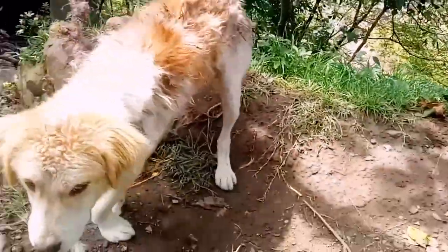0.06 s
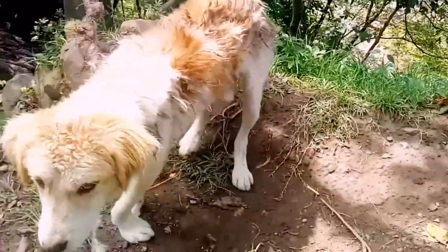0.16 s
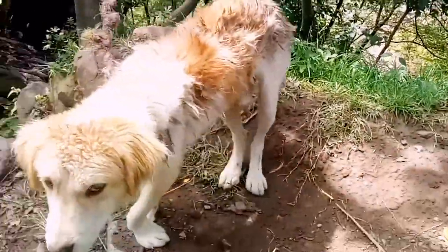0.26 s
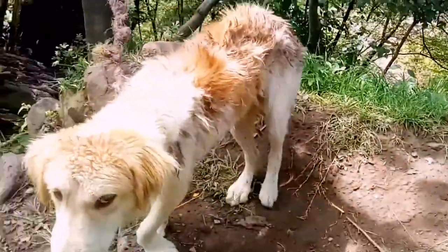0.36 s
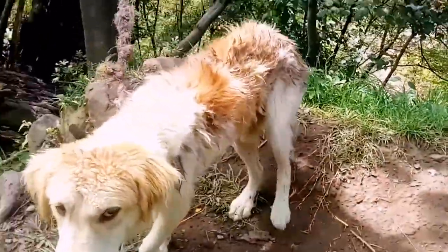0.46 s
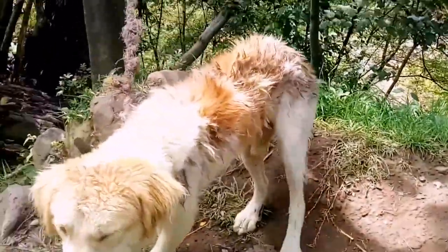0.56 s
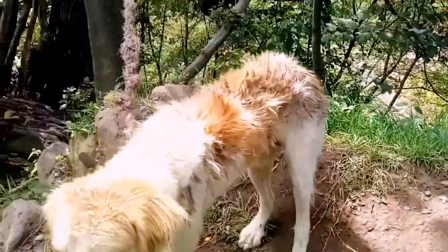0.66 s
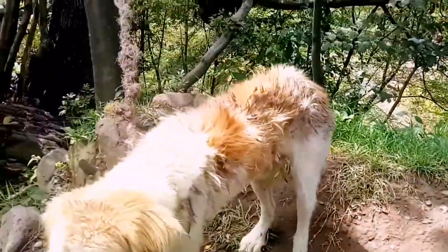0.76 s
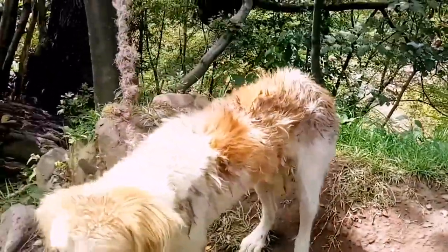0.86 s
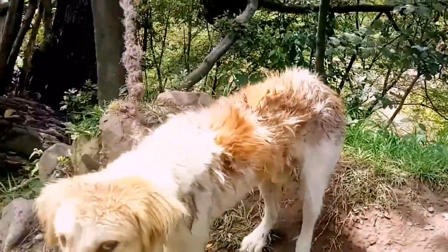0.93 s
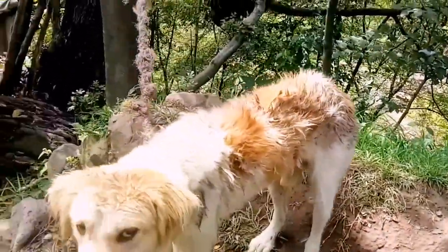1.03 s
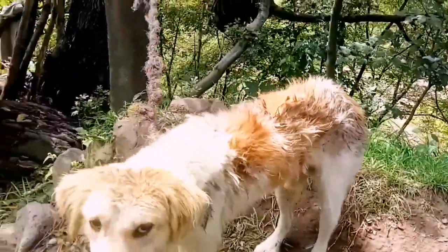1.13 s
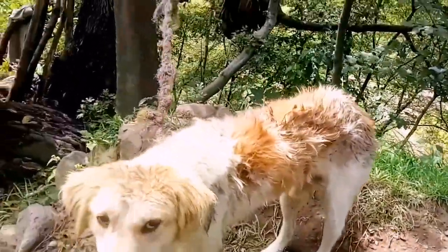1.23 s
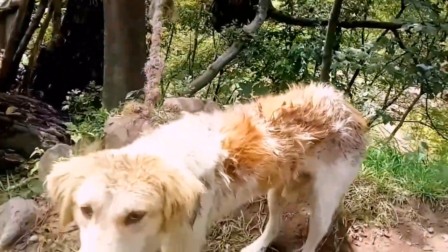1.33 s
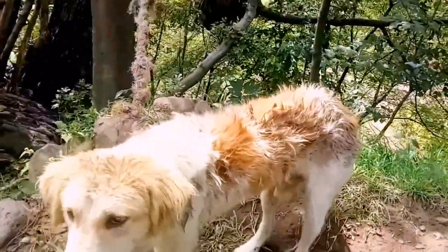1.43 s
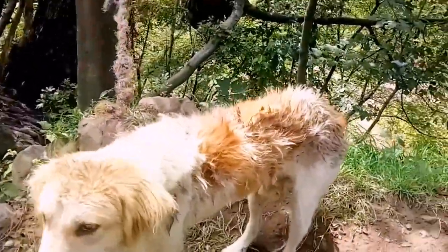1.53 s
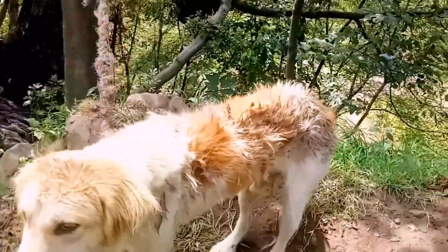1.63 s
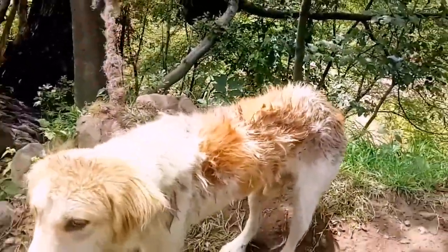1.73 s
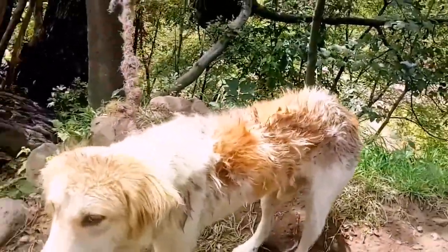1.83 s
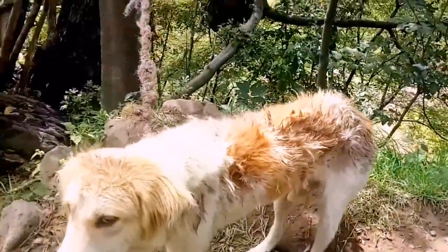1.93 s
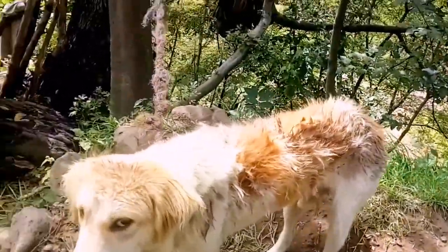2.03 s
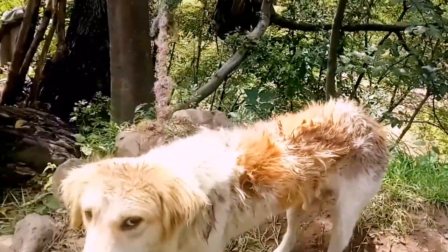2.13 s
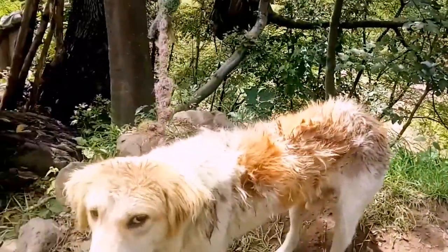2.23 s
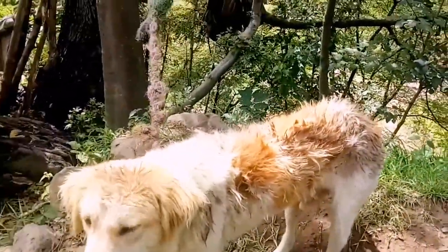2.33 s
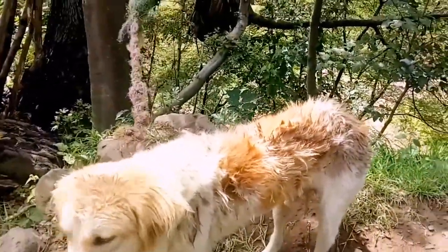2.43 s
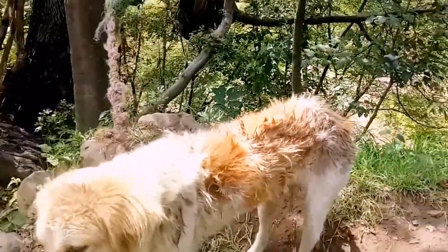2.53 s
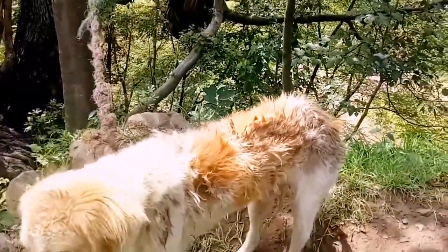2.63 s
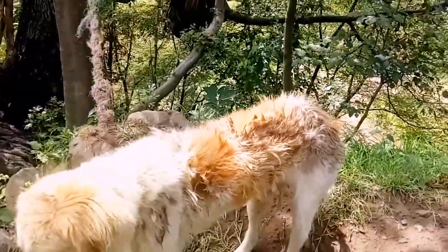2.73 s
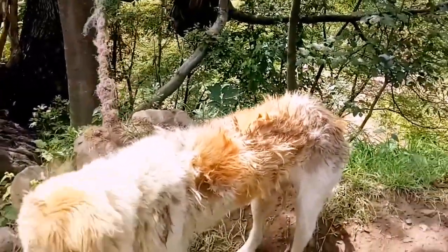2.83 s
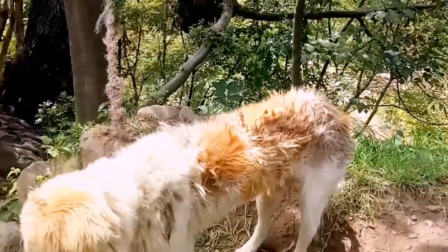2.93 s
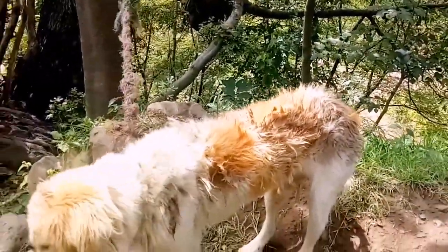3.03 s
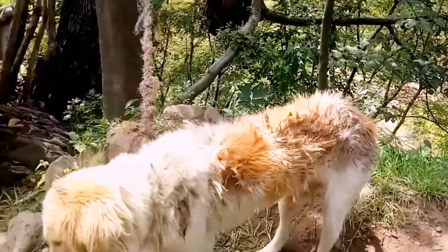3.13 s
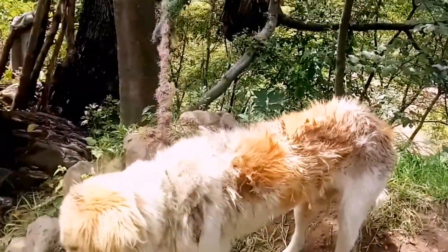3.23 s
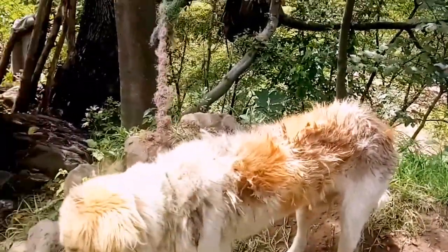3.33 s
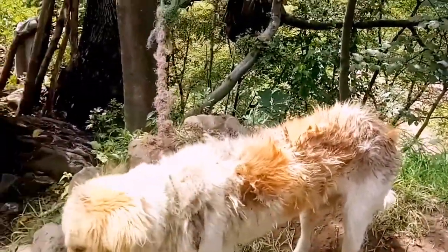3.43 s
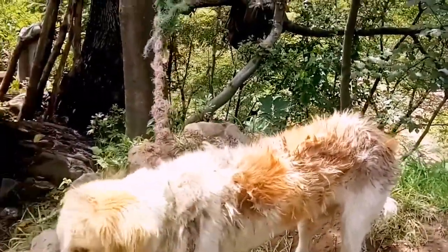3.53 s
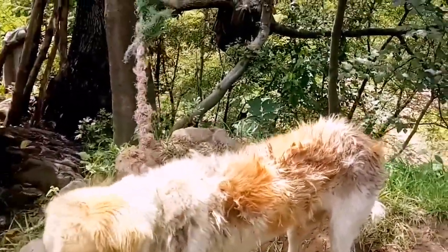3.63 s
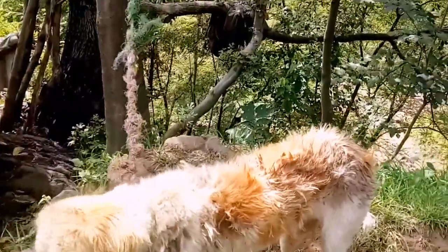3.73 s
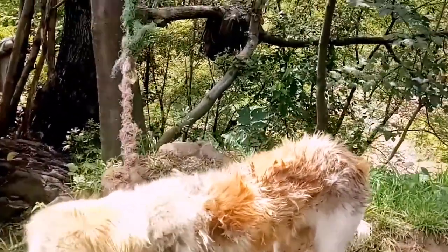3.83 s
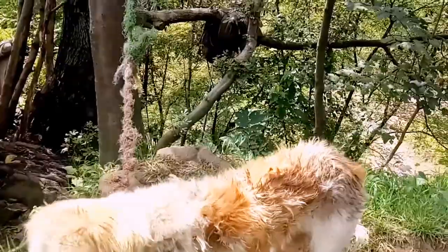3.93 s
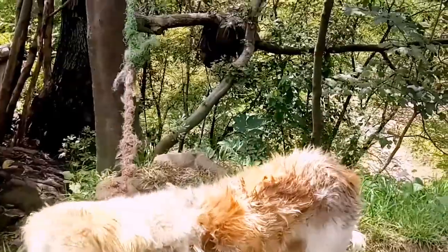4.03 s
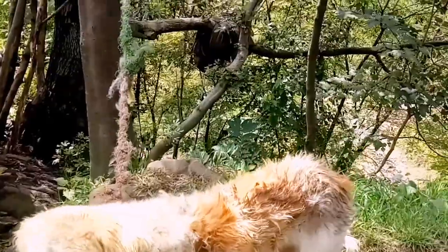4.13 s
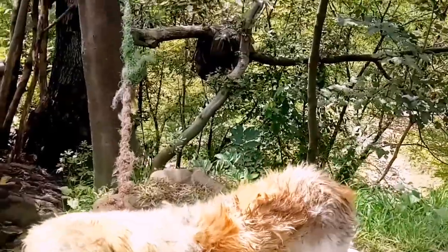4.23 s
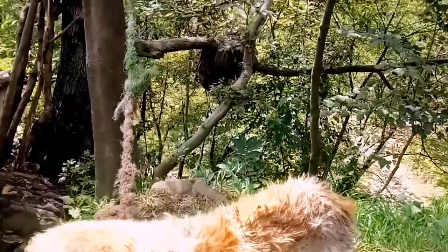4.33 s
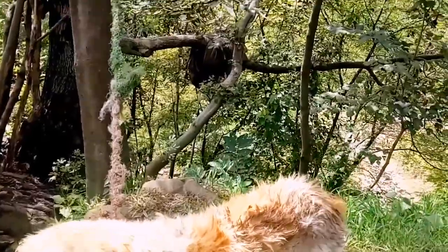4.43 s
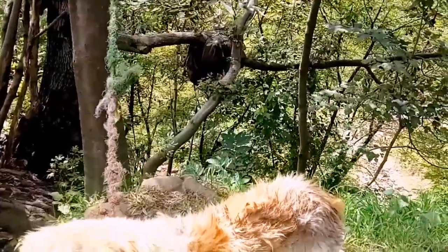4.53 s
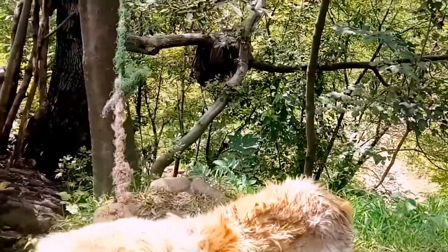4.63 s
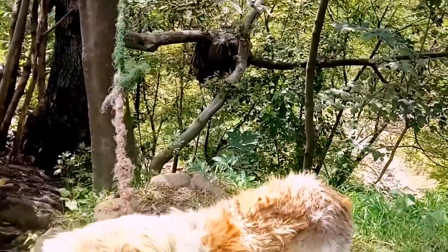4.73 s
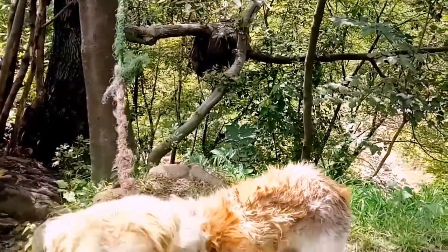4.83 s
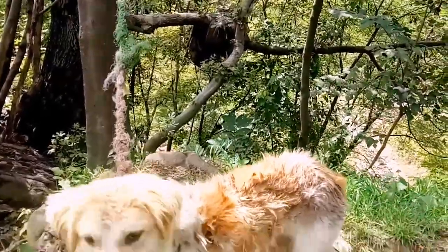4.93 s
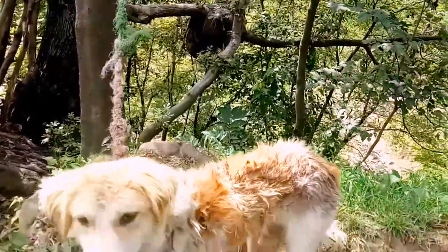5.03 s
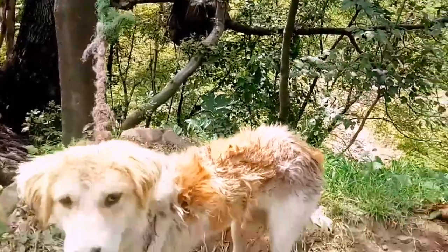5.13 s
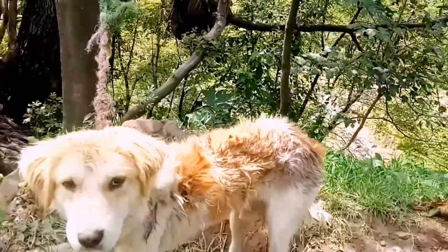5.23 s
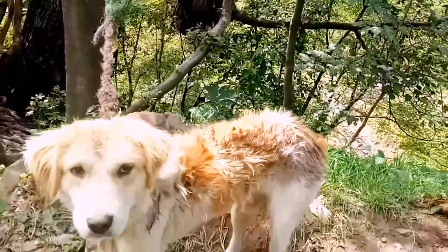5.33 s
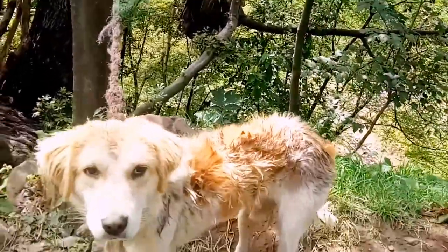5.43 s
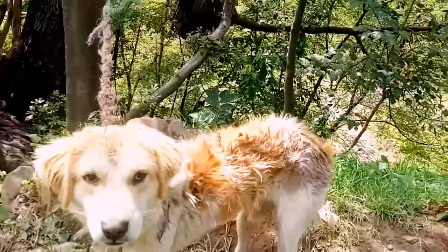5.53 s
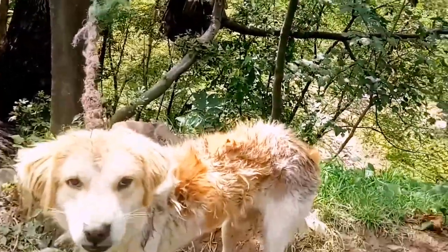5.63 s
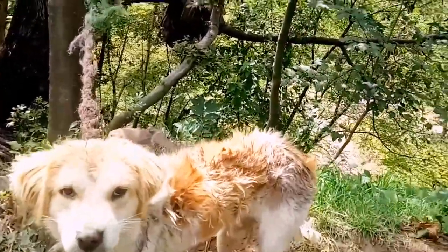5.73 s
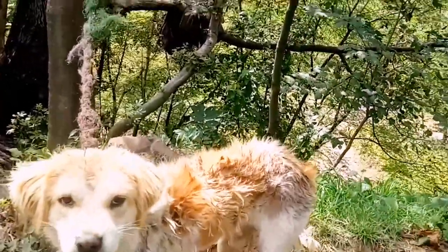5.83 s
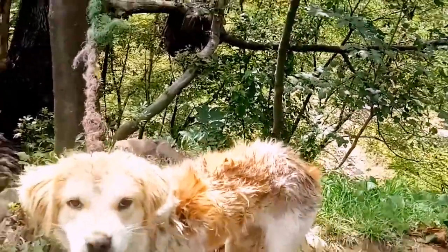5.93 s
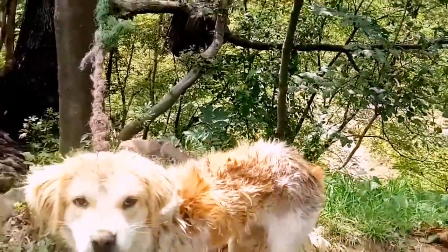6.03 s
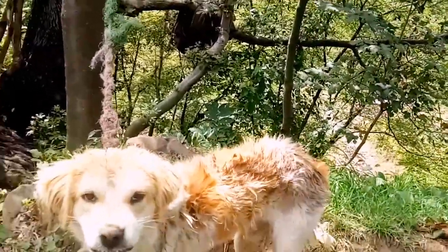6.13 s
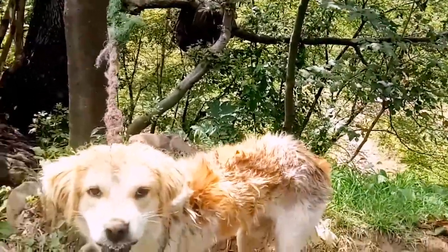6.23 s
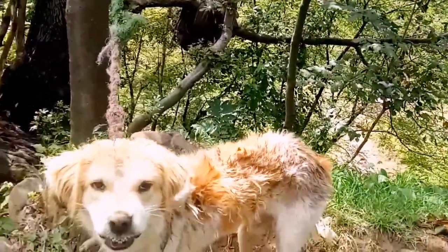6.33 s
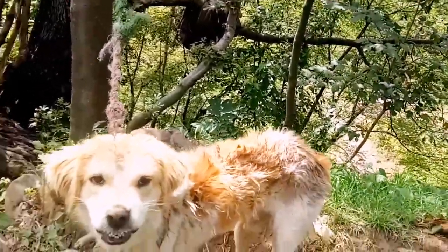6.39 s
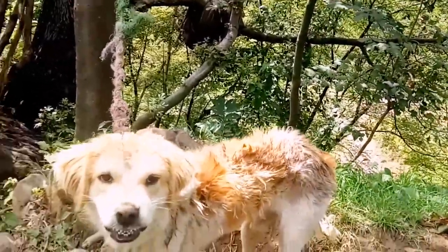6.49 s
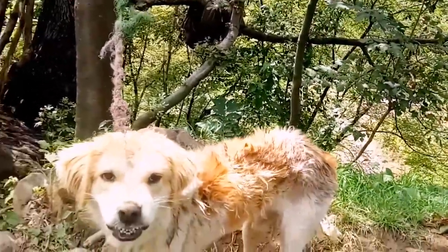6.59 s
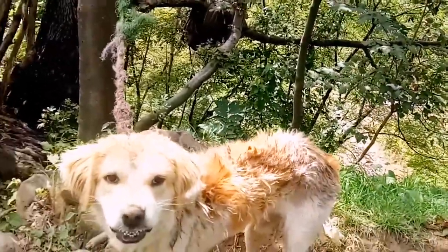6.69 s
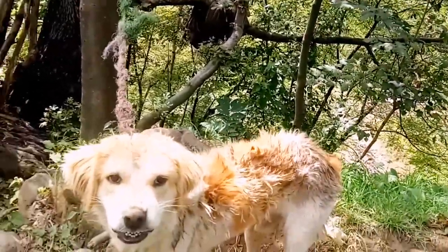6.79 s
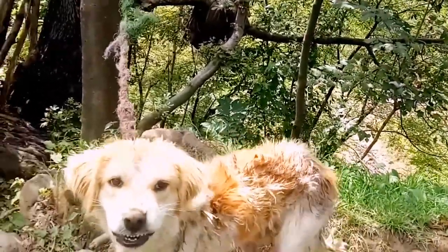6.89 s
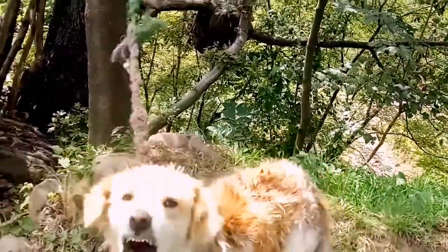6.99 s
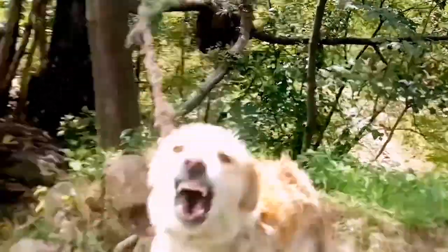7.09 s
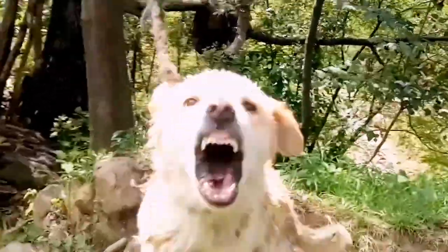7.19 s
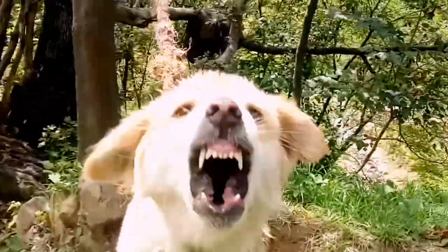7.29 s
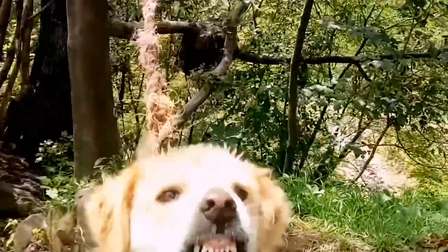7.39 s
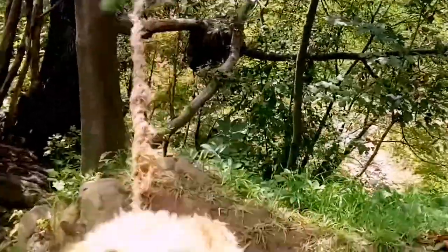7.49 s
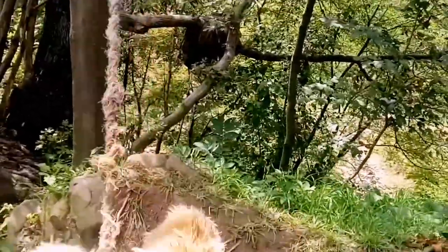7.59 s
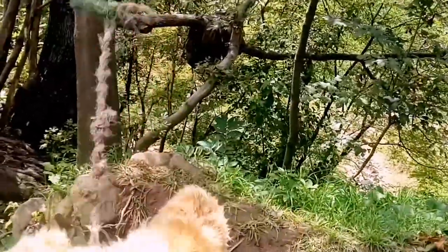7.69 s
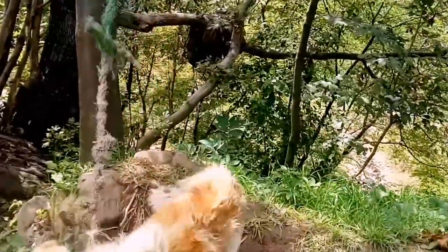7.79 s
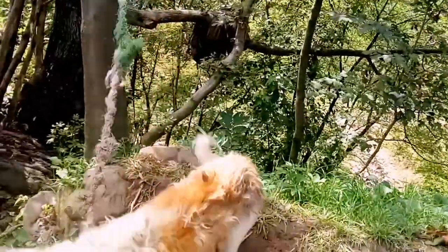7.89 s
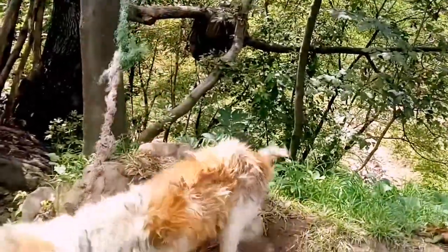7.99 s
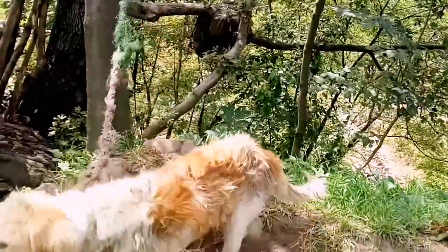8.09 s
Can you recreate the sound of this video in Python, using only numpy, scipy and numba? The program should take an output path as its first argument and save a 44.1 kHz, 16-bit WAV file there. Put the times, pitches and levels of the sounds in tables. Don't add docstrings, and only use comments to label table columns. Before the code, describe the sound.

A dog shuffles in dry leaves under a steady shrill cicada hiss, then at seven seconds bursts into harsh, overloaded close barks and a yelp.

```python
import sys
import numpy as np
from scipy import signal
from scipy.fft import rfft, irfft
from scipy.io import wavfile
from scipy.ndimage import uniform_filter1d, minimum_filter1d
from numba import njit

SR = 44100
rng = np.random.default_rng(int(sys.argv[2]) if len(sys.argv) > 2 else 0)


def decibels_to_gain(level_db):
    exponent = np.asarray(level_db, float) / 20
    return 10 ** exponent


def generate_wav(sig):
    pcm = np.round(np.clip(np.atleast_2d(sig).T, -1, 1) * 32767).astype(np.int16)
    wavfile.write(sys.argv[1], SR, pcm)


N = 359415
TIME = np.arange(N) / SR
HZ = np.maximum(np.arange(N // 2 + 1) * SR / N, 1)


def at_hz(points, column=1):
    points = np.array(points, float)
    return np.interp(np.log(HZ), np.log(np.maximum(points[:, 0], 1)), points[:, column])


def rms_one(x):
    return x / np.sqrt(np.mean(x ** 2) + 1e-20)


def drift(rate):
    knots = rng.standard_normal(int(9 * 200))
    return np.interp(TIME * rate, np.arange(len(knots)), knots) * 1.22


@njit
def resonate(x, hz, width, sr):
    y = np.zeros(len(x))
    r = np.exp(-np.pi * width / sr)
    for i in range(2, len(x)):
        drive = (1 - r * r) / 2 * (x[i] - x[i - 2])
        y[i] = drive + 2 * r * np.cos(2 * np.pi * hz[i] / sr) * y[i - 1] - r * r * y[i - 2]
    return y


# (frequency [Hz], left over right [dB], likeness [0-1])
PORTS = [(60, 10.5, 1), (300, 4.5, 0.3), (900, 9.5, 0.13), (2980, 9, 0.03), (4050, 13.5, 0.06),
         (4980, 8.5, 0.27), (6160, 0, 1), (8270, -1.5, 0.52), (9800, 1.5, 0.01), (11000, 6, 0.2),
         (13000, 16.5, .1), (15000, 19.5, .1)]
# (frequency [Hz], phase [rad])
PORT_LEAD = [(300, 0), (2500, 5.8), (4130, 5.2), (4910, 1.6), (5250, .1), (5600, 0)]


def at_ports(spectrum, sources):
    a, b = rfft(sources) * decibels_to_gain(at_hz(spectrum))
    right = decibels_to_gain(-at_hz(PORTS))
    alike = np.clip(at_hz(PORTS, column=2), 0, 1)
    even = 1 / np.sqrt(1 + right ** 2)
    other = alike * a * np.exp(-1j * at_hz(PORT_LEAD)) + np.sqrt(1 - alike ** 2) * b
    pair = irfft([even * a, even * right * other], N)
    return pair / np.sqrt(np.mean(pair.mean(axis=0) ** 2))


# (frequency [Hz], level [dB per Hz])
AIR = [(18, -38), (30, -20), (97, -15.5), (140, -9.5), (208, -9.5), (262, -9), (325, -8), (419, -13),
       (934, -6), (2630, -9), (3200, -22), (4160, -28), (7040, -120)]
# (time [s], level over calm [dB], fade [dB/s])
GUSTS = [(.0, 22, 70), (.56, 9.5, 53), (.97, 8.5, 90), (1.289, 14, 24), (2.3, 19.5, 120), (2.55, 25, 95),
         (3.18, 21.5, 95), (3.84, 18, 23), (4.45, 17.5, 7), (5.15, 15, 110), (5.36, 15, 15), (6.82, 10, 75),
         (7.002, 11, -11)]


def air():
    rise_db_per_s, calm_db = 96, -6.5
    noise = at_ports(AIR, rng.standard_normal((2, N)))
    lows = signal.sosfiltfilt(signal.butter(2, 550, fs=SR, output="sos"), noise)
    puffs = [db - np.maximum(rise_db_per_s * (s - TIME), fade * (TIME - s)) for s, db, fade in GUSTS]
    gust_db = calm_db + 0.53 * np.maximum(np.max(puffs, axis=0), 0) + 4.1 * drift(12)
    return decibels_to_gain(-45) * ((noise - lows) * decibels_to_gain(1.0 * drift(5.12)) + lows * decibels_to_gain(gust_db))


# (frequency [Hz], level [dB per Hz])
CHORUS = [(1650, -70), (2800, -31), (3140, -24.5), (3730, -7), (4120, 0), (4820, 1.5), (5930, -8),
          (7090, -21), (8010, -33.5), (9850, -33), (11400, -43.5), (14700, -30.5), (15400, -32)]
# (rate [1/s], depth [0-1])
BUZZES = [
    (36, 0.11),
    (88, 0.03),
    (420, 0),
]
# (time [s], level [dB])
WAVERS = [
    (2.71, -2.5),
    (4.72, 0.5),
    (4.82, 1),
]


def cicadas():
    waver_s = 0.05
    clicks = rng.standard_normal((2, N)) * decibels_to_gain(1.35 * rng.standard_normal((2, N)))
    for rate, depth in BUZZES:
        phase = 2 * np.pi * np.cumsum(rate * (1 + 0.0403 * drift(4))) / SR
        clicks = clicks * (1 + depth * np.sin(phase))
    waver_db = sum(db * np.maximum(1 - np.abs(TIME - s) / waver_s, 0) for s, db in WAVERS)
    return decibels_to_gain(-16.5 + waver_db + .5 * drift(9) + 0.82 * drift(40)) * at_ports(CHORUS, clicks)


def woods(x):
    t60_s, level_db, band_hz = 1, -36, [200, 2200]
    t = TIME[:SR]
    tail = rng.standard_normal((2, SR)) * decibels_to_gain(-60 * t / t60_s) * np.minimum(t / 0.014, 1)
    tail = signal.sosfilt(signal.butter(2, band_hz, "band", fs=SR, output="sos"), tail)
    tail = tail / np.sqrt(np.sum(tail ** 2) / 2)
    return decibels_to_gain(level_db) * signal.fftconvolve(x[None], tail, axes=1)[:, :N]


# (time [s], peak level [dB], centre [Hz], width [octaves], T60 [s])
SHUFFLES = [(.01, -35, 1400, 0.76, 0.94), (.005, -38, 824, 1.2, 0.33), (0.058, -35.5, 197, 0.62, 0.27),
            (0.499, -44.5, 169, 0.98, 1.04), (1.22, -39, 169, 1.2, 0.32), (2.297, -37.5, 139, 0.81, 0.26),
            (2.419, -45, 166, 0.95, 0.89), (2.599, -35.5, 1570, 1, 0.12), (3.13, -43.5, 425, 0.21, 0.71),
            (3.795, -28, 2600, .8, 0.042), (3.852, -30.5, 1900, 2.7, 0.13), (3.88, -33, 2740, .6, .03),
            (3.826, -38, 288, 0.35, 0.35), (3.835, -20, 2520, 0.76, 0.027), (4.391, -34, 285, 0.42, 0.24),
            (4.41, -31, 680, 0.76, 0.63), (4.47, -50.5, 750, 0.56, 1), (4.439, -37, 1430, 1.1, 0.69),
            (5.138, -36.5, 232, 0.46, 0.23), (1.46, -50, 111, 1.2, 0.7), (1.85, -49.5, 217, 1.4, 1.5),
            (7.96, -31, 147, 1.3, 0.51)]


def shuffles():
    out = np.zeros((2, N))
    t = TIME[:SR]
    for s, peak_db, hz, octaves, t60 in SHUFFLES:
        edges = hz * 2. ** np.array([-octaves / 2, octaves / 2])
        band = signal.butter(2, edges, "band", fs=SR, output="sos")
        mid, left, right = signal.sosfilt(band, rng.standard_normal((3, SR)))
        shape = decibels_to_gain(peak_db - 60 * t / t60) * np.minimum(t / (0.032 * t60), 1)
        step = rms_one(mid + 1.1 * np.array([left, right])) * shape * decibels_to_gain([[3], [-3]])
        i = round(s * SR)
        out[:, i:i + SR] += step[:, :N - i]
    return out


# (time [s], length [s], first pitch [Hz], last pitch [Hz], level [dB])
GROWLS = [
    (5.13, .25, 245.7, 219.3, -49.5),
    (5.38, .21, 244, 131, -50),
    (7.864, .1, 196.5, 148, -29.5),
]
# (multiple of pitch [-], level [dB])
GROWL_OVERTONES = [(2, -12.5), (3, -7)]


def growls():
    out = np.zeros(N)
    wobble, flutter_db = .025 * drift(25), 2.5 * drift(40)
    for start, length, first_hz, last_hz, db in GROWLS:
        way = np.clip((TIME - start) / length, 0, 1)
        pitch = (first_hz + (last_hz - first_hz) * way) * (1 + wobble)
        phase = 2 * np.pi * np.cumsum(pitch) / SR
        tone = np.sin(phase) + sum(decibels_to_gain(level_db) * np.sin(k * phase) for k, level_db in GROWL_OVERTONES)
        out += decibels_to_gain(db + flutter_db) * np.sin(np.pi * way) ** .6 * tone
    return out


# (time [s], fold pitch and first throat resonance [Hz], effort [dB], roughness [0-1], mouth [Hz])
HOARSE_BARK = [(7.035, 562, -28, .9, 900), (7.055, 614.6, -4, 0.73, 1010), (7.1, 645.4, -1.2, .85, 957),
               (7.13, 645.4, 1, 0.59, 875), (7.16, 633.5, -2.5, 0.9, 825), (7.187, 789.3, -10.5, .7, 560),
               (7.2, 799.5, -26, 0.81, 580), (7.249, 700, -59, .9, 805)]
LOUD_BARK = [(7.259, 559, -9, .9, 900), (7.288, 599.3, -3.5, 0.81, 955), (7.302, 589.6, 11, .24, 900),
             (7.349, 597, 9, .25, 900), (7.356, 643, 6, .14, 950), (7.397, 528, 6, .07, 790),
             (7.408, 513.5, -1, .8, 704), (7.43, 524, -7.5, 0.87, 734), (7.448, 477, -20, 0.77, 670)]
GROWLED_BARK = [(7.455, 488.2, -13.5, .6, 672), (7.475, 524.2, -10.5, .6, 680), (7.509, 567.4, -7, .7, 726),
                (7.54, 538, -15, .8, 715), (7.547, 554, -2, .6, 994), (7.585, 550, -0.2, .7, 914),
                (7.623, 578.5, -9, .7, 920), (7.635, 621, -21.5, .8, 1040),
                (7.66, 574.6, -15.5, 0.78, 1080)]
SNARL = [(7.693, 555, -20, .8, 1160), (7.7, 551, -6, .45, 1110), (7.722, 520, -13, .9, 1020),
         (7.735, 448, -6.5, .6, 920), (7.765, 470, -7.5, .55, 900)]
YELP = [(7.779, 512.4, -2.5, 0.081, 900), (7.805, 527, -2.5, 0.013, 900), (7.824, 521.6, -3.5, 0.072, 900),
        (7.838, 483, -4.5, 0.067, 900), (7.848, 526, -17, .8, 900), (7.865, 561, -15, .55, 900),
        (7.89, 511, -22, .6, 900), (7.92, 497, -27.5, 0.8, 900), (7.944, 510.7, -21.5, .55, 900)]
# (mouth [dB], upper mouth resonance [Hz], its level [dB], slap line [dB])
JAWS = [
    (-6, 1620, -9.5, -33),
    (-2.5, 1620, -12, -31),
    (-8, 1385, -3, -27),
    (-2.5, 1420, -12, -34.5),
    (-14, 1440, -2.5, -31),
]
# (time [s], length [s], first rate [1/s], last rate [1/s], line gain [dB])
GLIDES = [
    (7.441, .09, 254, 299, 13.5),
    (7.662, .105, 170, 520, 23),
]


def call_curves():
    jaw_open_s, shut_share, shut_db = 0.03, 0.34, -10
    calls = [HOARSE_BARK, LOUD_BARK, GROWLED_BARK, SNARL, YELP]
    rows = [tuple(row) + tuple(jaw) for call, jaw in zip(calls, JAWS) for row in call]
    s, *columns = np.transpose(rows)
    curves = [np.interp(TIME, s, c) for c in columns]
    pitch, _, rough, mouth_hz, mouth_db, upper_hz, upper_db, line_db = curves
    effort_db = np.interp(TIME, [s[0] - .04, *s, s[-1] + 0.07], [-90, *columns[1], -90])
    starts = np.array([call[0][0] for call in calls])
    latest = starts[np.maximum(np.searchsorted(starts, TIME) - 1, 0)]
    shut = np.exp(-np.abs(TIME - latest) / jaw_open_s)
    upper_hz = upper_hz * (1 - shut_share * shut)
    upper_db = upper_db + shut_db * shut + np.clip(effort_db, -14, 0)
    mouth_db = mouth_db + 12 * (rough - .75)
    rate = .49 * pitch
    for start, length, first, last, gain_db in GLIDES:
        way = (TIME - start) / length
        inside = (way > 0) & (way < 1)
        rate = np.where(inside, first + (last - first) * way, rate)
        line_db = line_db + gain_db * inside * np.sin(np.pi * way) ** 2
    return pitch, effort_db, np.clip(rough, 0, 1), mouth_hz, mouth_db, rate, upper_hz, upper_db, line_db


# (multiple of pitch [-], level [dB])
OVERTONES = [(2, -15), (3, -27), (4, -32), (5, -39), (7, -42)]
# (frequency [Hz], width [Hz], level [dB])
HEAD = [(1210, 290, -11), (2600, 1100, -24.5), (4100, 1500, -25.5)]


def voice():
    pitch, effort_db, rough, mouth_hz, mouth_db, rate, upper_hz, upper_db, line_db = call_curves()
    barking = slice(7 * SR, N)
    phase = 2 * np.pi * np.cumsum(pitch * (1 + 0.0397 * rough * drift(150))) / SR
    clear = np.sin(phase) + sum(decibels_to_gain(db) * np.cos(k * phase) for k, db in OVERTONES)

    turns = np.cumsum(rate * (1 + (.05 + .3 * rough ** 2) * drift(190))) / SR
    slaps = np.diff(np.floor(turns), prepend=0) * decibels_to_gain(3.2 * rough * rng.standard_normal(N))
    gate = np.exp(-3.0 * (turns % 1))
    source = 5.5 * slaps + 1.38 * rough * gate * rng.standard_normal(N)
    source = signal.sosfilt(signal.butter(2, 5000, fs=SR, output="sos"), source)

    def twice(hz, width):
        once = resonate(source, hz, width, SR)
        return rms_one(resonate(once, hz, width, SR)[barking])

    harsh = twice(pitch, 162.0)
    harsh -= decibels_to_gain(mouth_db[barking]) * twice(mouth_hz, 240.)
    harsh += decibels_to_gain(upper_db[barking]) * twice(upper_hz, 240.0)
    harsh -= decibels_to_gain(line_db[barking]) * twice(rate, 120.)
    head = 0
    for hz, width, db in HEAD:
        head = head + decibels_to_gain(db) * rms_one(resonate(source, np.full(N, float(hz)), width, SR)[barking])
    harsh += decibels_to_gain(.5 * np.clip(effort_db[barking], -30, 0)) * head
    harsh /= (uniform_filter1d(harsh ** 2, size=500) + 0.033) ** 0.43

    rasp_band = signal.butter(2, [2800, 9500], "band", fs=SR, output="sos")
    rasp = signal.sosfilt(rasp_band, gate * rng.standard_normal(N))
    sound = decibels_to_gain(-17.5 + 0.47 * effort_db) * rasp + np.sqrt(2 * (1 - rough)) * (1 - rough) * clear
    sound[barking] += rough[barking] ** 0.54 * harsh
    return decibels_to_gain(effort_db) * sound, effort_db


# (frequency [Hz], level [dB])
VOICE_RIGHT = [(60, 5), (300, -8), (600, -6), (1300, -12.5), (4400, -13.5), (15000, -16)]
# (delay [s], level [dB])
GROUND = [
    (.0021, -12),
    (.0034, -7),
]


def near_bark(bark):
    paths = []
    for s, db in GROUND:
        echo = decibels_to_gain(db) * np.minimum(HZ / 1500, 1) * np.exp(-2j * np.pi * HZ * s)
        paths.append(1 + echo)
    paths = np.array(paths)
    paths[1] *= decibels_to_gain(at_hz(VOICE_RIGHT)) * np.exp(-2j * np.pi * HZ * .00008)
    near = decibels_to_gain(3.5) * irfft(rfft(bark) * paths, N)
    return near + 0.036 * np.minimum(near ** 2, 4)


def gain_control(effort_db):
    duck_db, duck_from_db, release_s = -14, -19, 0.04
    loud = np.clip((effort_db - duck_from_db) / 5.4, 0, 1)
    slide = TIME / release_s
    held = np.exp(np.maximum.accumulate(np.log(loud + 1e-9) + slide) - slide)
    return decibels_to_gain(duck_db * uniform_filter1d(held, size=200))


def limiter(x, ceiling):
    gain = np.minimum(1, ceiling / (np.abs(x) + 1e-9))
    return x * uniform_filter1d(minimum_filter1d(gain, size=61), size=31)


# (frequency [Hz], share [0-1])
DROPPED = [(250, .0), (450, .05), (700, .0), (1600, .0), (2400, .025), (3300, .0), (6000, .01), (7400, .12),
           (8300, .66), (11700, .68), (12800, .22), (14000, .05)]


def thin_link(x):
    hz, _, cells = signal.stft(x, SR, nperseg=2048, noverlap=1536)
    power = np.sum(np.abs(cells) ** 2, axis=0) + 1e-18
    level = np.log(uniform_filter1d(uniform_filter1d(power, size=15, axis=0), size=3, axis=1))
    level -= np.median(level, axis=1, keepdims=True)
    level -= .85 * uniform_filter1d(level, size=61, axis=0)
    share = np.interp(hz, *np.transpose(DROPPED))
    rank = (share * level.shape[1]).astype(int)
    bar = np.sort(level, axis=1)[np.arange(len(hz)), rank]
    return signal.istft(cells * (level >= bar[:, None]), SR, nperseg=2048, noverlap=1536)[1][:, :N]


def scene():
    bark, effort_db = voice()
    behind = air() + cicadas() + woods(bark) * decibels_to_gain([[12], [7]]) + shuffles()
    ducked = limiter(gain_control(effort_db) * behind, ceiling=.74)
    return ducked + growls() * decibels_to_gain([[2.5], [-2.5]]) + near_bark(bark)


def low_pass(x):
    return signal.sosfilt(signal.butter(12, 16590, fs=SR, output="sos"), x)


def record(dry):
    knee = 10
    clipped = .985 * dry / (1 + np.abs(dry) ** knee) ** (1 / knee)
    cut = signal.sosfilt(signal.cheby2(18, 60, 15720, fs=SR, output="sos"), clipped)
    return low_pass(thin_link(cut))


dry = scene()
out = record(dry)
generate_wav(out)
```